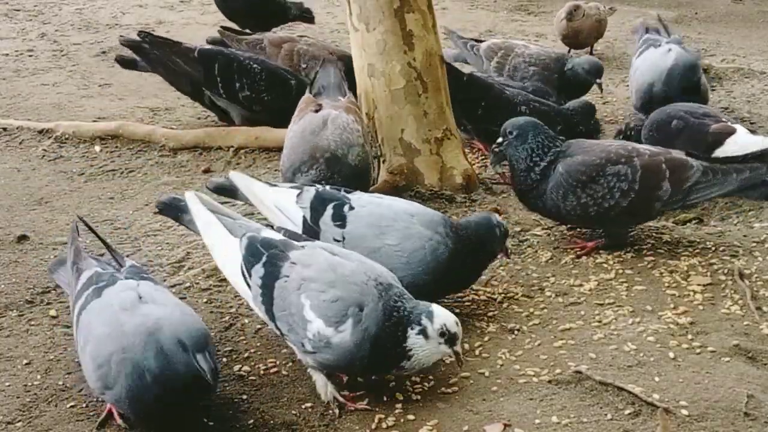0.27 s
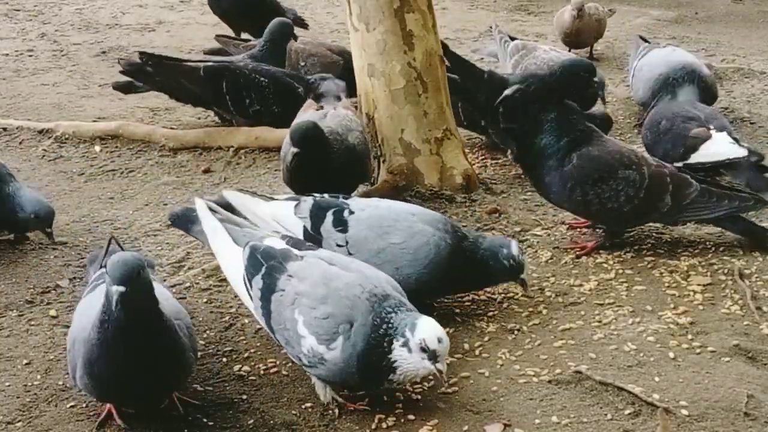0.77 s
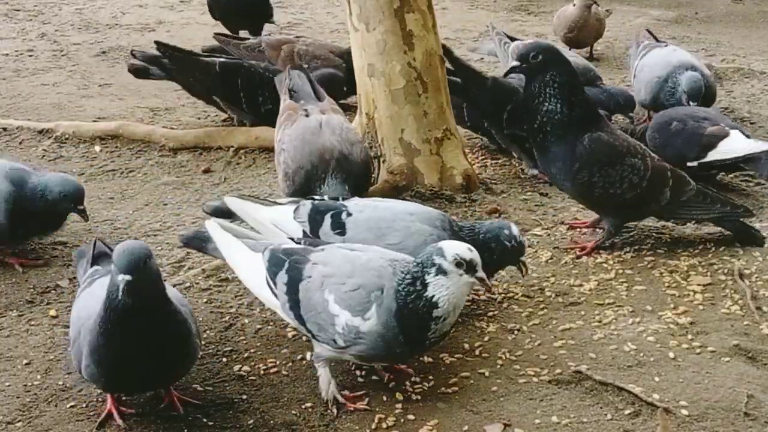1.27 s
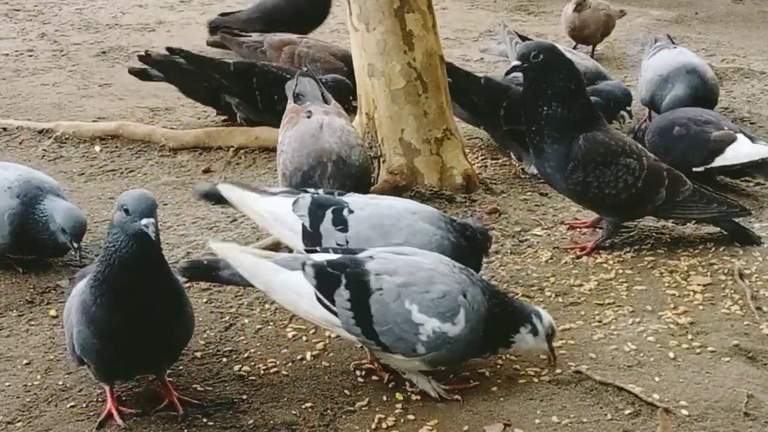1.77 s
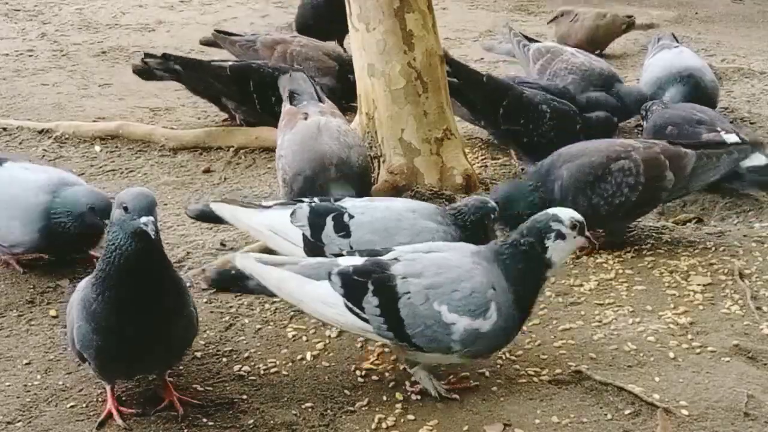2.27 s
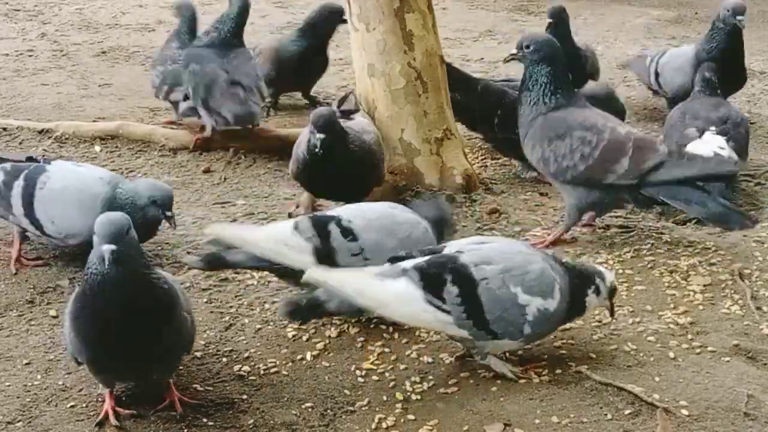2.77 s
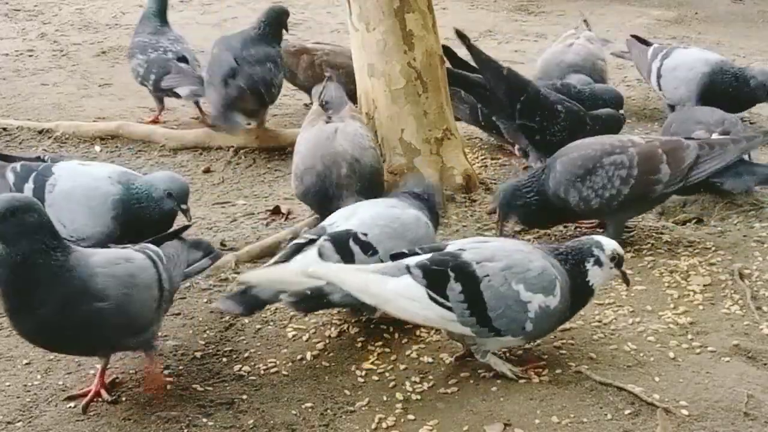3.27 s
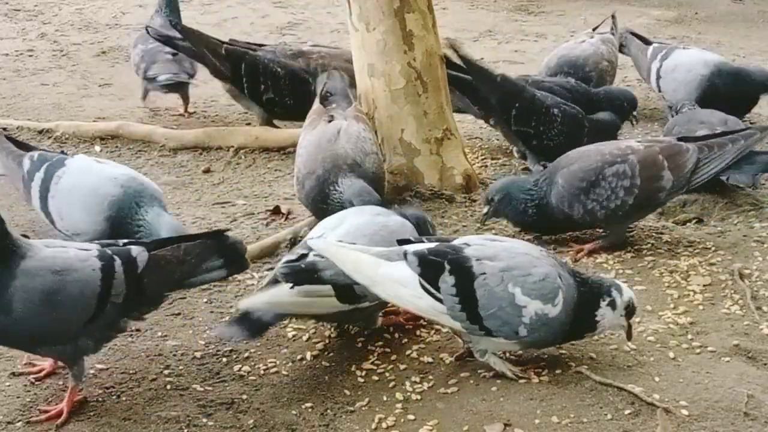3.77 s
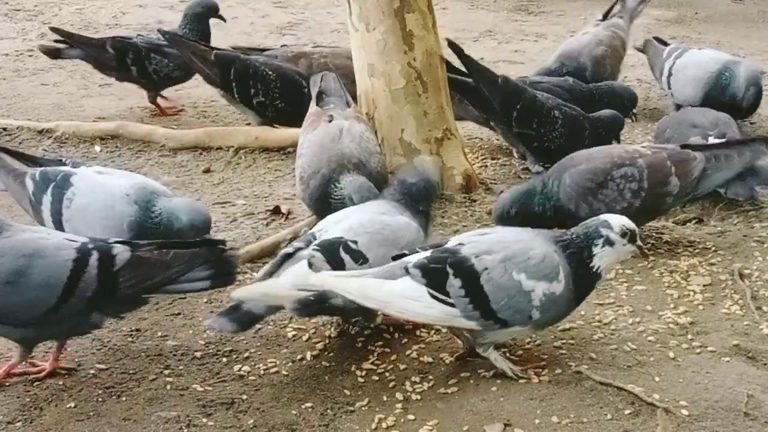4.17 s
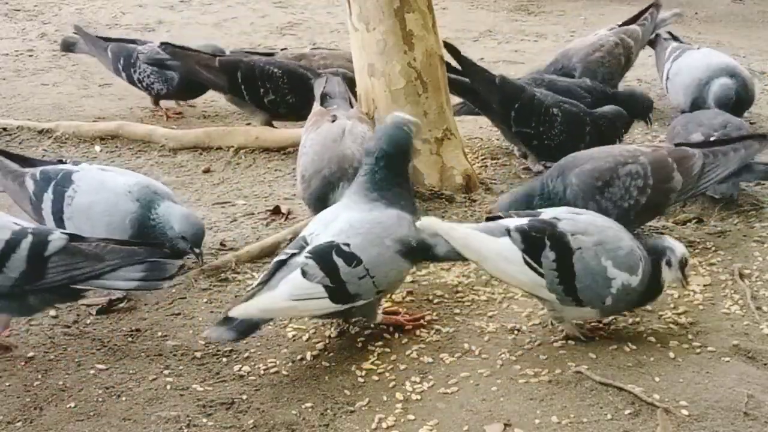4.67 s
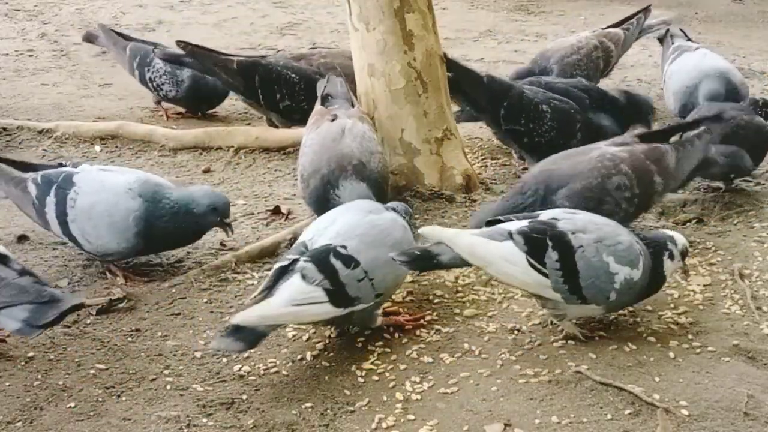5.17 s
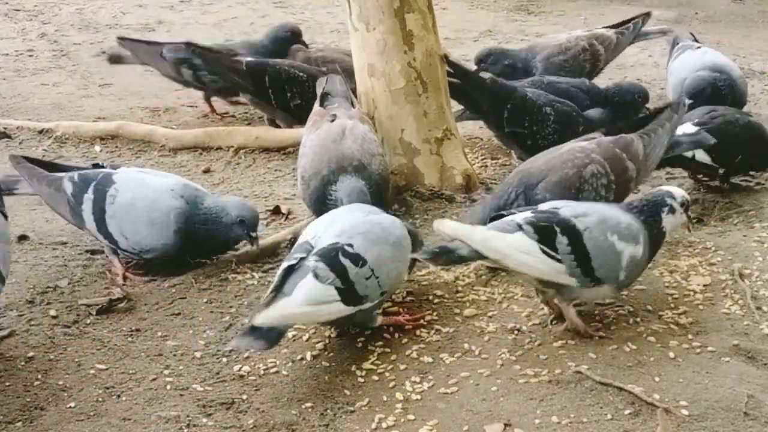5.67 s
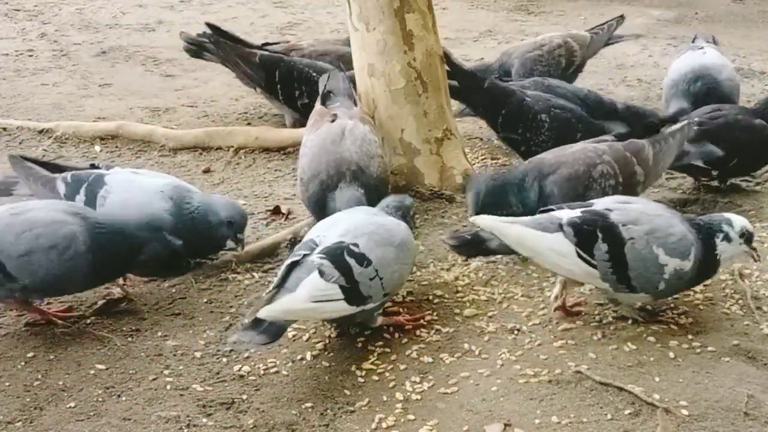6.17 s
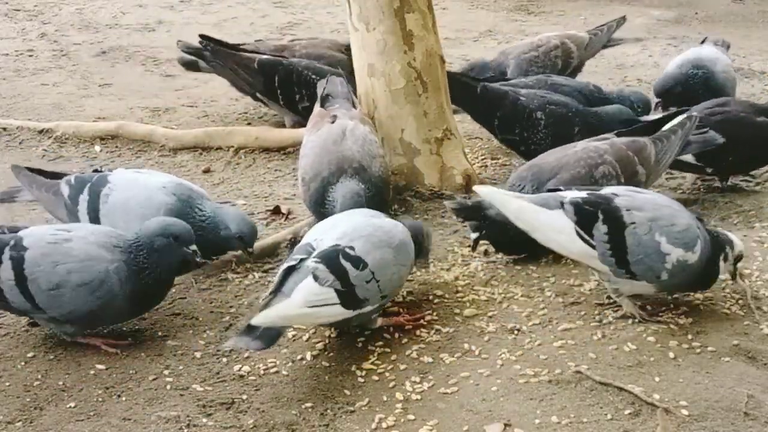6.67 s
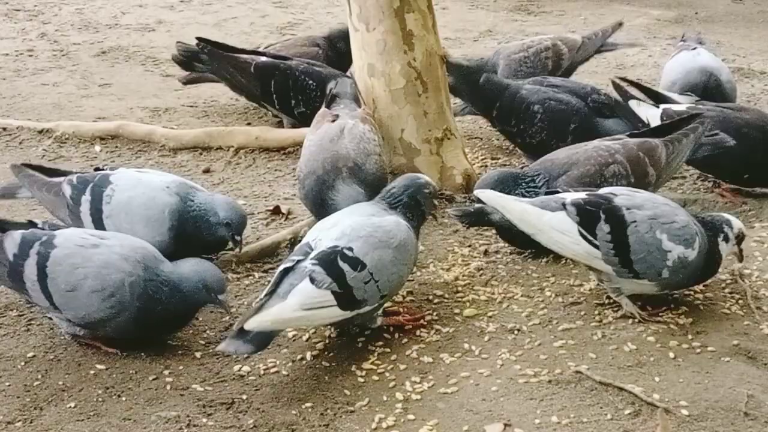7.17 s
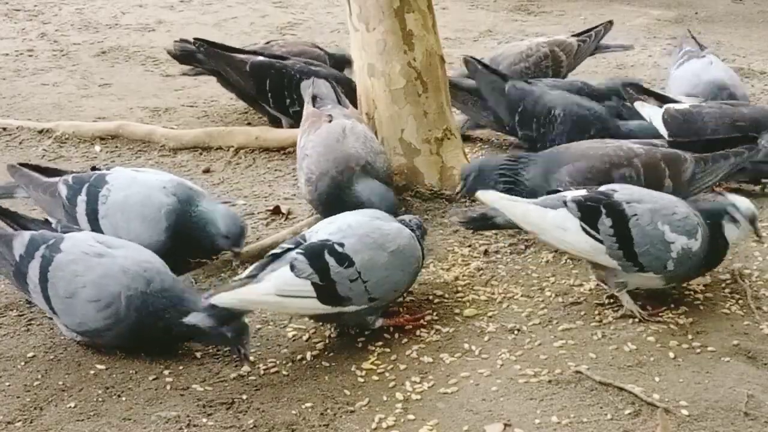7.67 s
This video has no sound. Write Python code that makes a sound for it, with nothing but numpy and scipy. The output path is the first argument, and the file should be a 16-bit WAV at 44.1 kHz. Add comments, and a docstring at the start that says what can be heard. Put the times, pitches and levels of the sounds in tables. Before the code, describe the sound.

Bursts of pigeon wing flaps, claps and feather rustle in a park, with sparrow chirps, faint town hum and one low coo.

```python
"""A city park, where pigeons feed on scattered grain close to the microphone.
They jostle and flutter up: wings push puffs of air, wing tips clap and feathers whistle.
At the end one coos through its swollen crop, the pouch in its throat.
Sparrows chirp in the trees around; far off are two hoarse caws, thin whines and the hum of the town."""
import sys
import numpy as np
from scipy import signal
from scipy.fft import rfft, irfft, next_fast_len
from scipy.io import wavfile
from scipy.ndimage import uniform_filter1d, map_coordinates

SR = 44100
rng = np.random.default_rng(int(sys.argv[2]) if len(sys.argv) > 2 else 0)


def file_out(sig):
    """Save sig as 16-bit WAV at sys.argv[1]."""
    # one column per channel
    cols = np.atleast_2d(sig).T
    # limit, then scale
    lim = np.clip(cols, -1, 1)
    pcm = np.round(lim * 32767).astype(np.int16)
    wavfile.write(sys.argv[1], SR, pcm)


N = 349713
TIME = np.arange(N) / SR


def amp(db):
    """Turns decibels into a volume factor."""
    return 10 ** (np.asarray(db) / 20)


def unit(x):
    """Scales a sound to an average (rms) level of one."""
    return x / np.sqrt(np.mean(x ** 2) + 1e-20)


def look_up(table, hz):
    """Reads between a table's rows, with every octave equally wide."""
    row_hz, value = np.transpose(table)
    return np.interp(np.log(hz + 1), np.log(row_hz + 1), value)


def add(mix, start, sound):
    """Mixes a sound in, starting at a time in seconds."""
    part = mix[max(round(start * SR), 0):][:len(sound)]
    part += sound[:len(part)]


def colour(x, spectrum):
    """Turns each frequency up or down as a table says, then sets the level to one."""
    size = next_fast_len(len(x))
    gains = amp(look_up(spectrum, np.fft.rfftfreq(size, 1 / SR)))
    return unit(irfft(rfft(x, size) * gains, size)[:len(x)])


def noise(spectrum, size):
    """Noise with a chosen tone colour."""
    return colour(rng.standard_normal(size), spectrum)


def wander(t, rate):
    """Drifts to a new random value `rate` times a second."""
    targets = rng.standard_normal(4096)
    return map_coordinates(targets, [(t - t[0]) * rate], order=1, mode="wrap")


def swell(t, rise_s, decay_s):
    """Rises softly to one, then dies away."""
    shape = (1 - np.exp(-(t / rise_s) ** 2)) * np.exp(-t / decay_s)
    return shape / shape.max()


def bump(t, centre, length):
    """A bell-shaped rise to one and back."""
    return np.exp(-(2 * (t - centre) / length) ** 2)


def rasp(t, depth, rate):
    """A fast random flutter of level that makes a pure tone harsh."""
    flutter = unit(uniform_filter1d(wander(t, rate), round(SR / rate)))
    return (1 + depth * flutter) / np.sqrt(1 + depth ** 2)


# How long the park echoes: (frequency [Hz], time to fade by 60 dB [s])
ECHO_TIMES = [(200, 0.53), (1000, 1), (4000, 0.7), (7000, 0.7), (14000, 0.17)]


def outdoors(x, echo_db, early_db=1., early_s=.028):
    """Adds echoes from ground, trunks and walls: a strong early cluster and a long thin tail."""
    t = np.arange(SR) / SR
    bounces = rng.standard_normal(SR) * (rng.random(SR) < 1 / 20) * (t > .003)
    bounces *= 1 + amp(early_db) * np.exp(-t / early_s)
    hz, age, bands = signal.stft(bounces, SR, nperseg=256)
    fade = amp(-60 * age / look_up(ECHO_TIMES, hz)[:, None])
    tail = signal.istft(bands * fade, SR, nperseg=256)[1]
    heard = amp(echo_db) * signal.fftconvolve(x, tail / np.linalg.norm(tail))
    heard[:len(x)] += x
    return heard


# Tone colour of the town's hum: (frequency [Hz], gain [dB])
TOWN_COLOUR = [(20, -42), (35, -23), (55, -4), (90, 3.5), (130, 3), (220, -2), (400, -10), (800, -19.5),
               (1500, -31.5), (2600, -21), (4400, -13), (5400, -19), (6800, -12), (8600, -31), (11500, -37),
               (15000, -29)]
# How the hum rises and falls: (time [s], gain [dB])
TOWN_SWELL = [(0, -3.5), (.8, 3), (1.45, -3.5), (2.1, 0), (3.5, 1), (4.8, 0), (5.6, -1.5), (6.2, -1),
              (7, 1.5), (7.93, 2)]


def town(level_db=-59.5):
    """Distant traffic and air, slowly swelling and fading."""
    swell_db = np.interp(TIME, *np.transpose(TOWN_SWELL)) - .03 * wander(TIME, 4)
    return amp(level_db + swell_db) * noise(TOWN_COLOUR, N)


# Far-off tones: (time [s], length [s], first pitch [Hz], last pitch [Hz], relative level [dB])
WHINES = [(1.999, 0.25, 4440, 4630, -63), (4.169, 0.096, 697, 693, -66.5), (5.044, 0.84, 1055, 980, -69.5),
          (5.849, 0.58, 3360, 3130, -65.5), (5.85, 0.52, 6620, 6400, -71), (6.4, .9, 3130, 2870, -68),
          (6.649, 1.25, 2376, 2130, -71), (6.76, .6, 4750, 4400, -72)]


def whines(gain_db=-4.):
    """Thin, slowly gliding tones from far away, smeared by echoes."""
    out = np.zeros(N)
    for start, length, from_hz, to_hz, db in WHINES:
        t = np.arange(0, length, 1 / SR)
        hz = np.linspace(from_hz, to_hz, len(t)) * (1 + .018 * wander(t, 200))
        tone = np.sin(2 * np.pi * np.cumsum(hz) / SR) * rasp(t, depth=1., rate=60.1)
        tone *= signal.windows.tukey(len(t), .15)
        add(out, start, amp(db + gain_db + 2.2 * wander(t, 8.1)) * tone)
    return outdoors(out, echo_db=4.5)[:N]


# What a crow's throat lets through: (frequency [Hz], gain [dB])
CROW_THROAT = [(900, -43), (1450, -11.5), (1650, 0.5), (1800, 1.5), (1950, -5), (2300, -23), (4000, -40)]
# The two caws: (time [s], relative level [dB], length [s])
CAWS = [(5.168, -62, 0.31), (6.239, -64, 0.51)]


def crow(pulse_hz=290.5, gain_db=-3.):
    """Pulses of breath ring in a crow's throat; from so far away the caws are mostly echo."""
    out = np.zeros(N)
    for start, db, length in CAWS:
        t = np.arange(0, length, 1 / SR)
        breath = rng.standard_normal(len(t)) * (1 + np.cos(2 * np.pi * pulse_hz * t))
        caw = colour(breath, CROW_THROAT) * signal.windows.tukey(len(t), .7)
        add(out, start, amp(db + gain_db) * caw)
    return outdoors(out, echo_db=2.5)[:N]


def ground_bounce(x, share=.31):
    """A bird in a tree is heard twice: directly, and off the ground a moment later."""
    lag = round(rng.uniform(.0013, .0026) * SR)
    return (np.pad(x, (0, lag)) + share * np.pad(x, (lag, 0))) / np.sqrt(1 + share ** 2)


# What a sparrow's throat and beak let through: (frequency [Hz], gain [dB])
SPARROW_BEAK = [(2300, -23), (2800, -14), (3200, -4.5), (3700, -0.5), (4500, 0), (6200, 0), (7000, -5.5),
                (7800, -23.5), (9000, -25), (12000, -16.5)]


def sparrow(t, hz, db, rough, echo_db, octave_db, trill_hz=170.8, gain_db=-2.):
    """A buzzy whistle; on low notes the throat favours the octave, at twice the pitch."""
    trill = .035 * np.sin(2 * np.pi * trill_hz * t + wander(t, 100))
    hz = hz * (1 + trill + .022 * wander(t, 160))
    hz *= 1 + .035 * wander(t, 900)
    phase = 2 * np.pi * np.cumsum(hz) / SR
    voice = np.zeros(len(t))
    for k, harmonic_db in enumerate([0, octave_db, octave_db - 10, octave_db - 13], 1):
        voice += amp(harmonic_db + look_up(SPARROW_BEAK, k * hz)) * np.sin(k * phase)
    voice *= amp(db + gain_db + 3 * wander(t, 196.6)) * rasp(t, rough, rate=2615)
    voice *= signal.windows.tukey(len(t), .28)
    return outdoors(ground_bounce(np.sqrt(2) * voice), echo_db)


# Sliding sparrow notes: (time [s], length [s], first pitch [Hz], last pitch [Hz],
# relative level [dB], roughness [0 = none], echo [dB])
SLIDES = [(0.121, 0.14, 3950, 4880, -64.5, .1, -5), (0.838, .02, 6600, 4250, -50.5, .4, -3.5),
          (0.859, 0.019, 4400, 5700, -52.5, .4, -2), (0.952, 0.025, 6970, 6800, -44, 0.4, 3.5),
          (.958, 0.017, 6000, 3440, -47.5, 0.8, 7), (.972, .075, 4490, 3693, -49.5, 0.9, 6.5),
          (1.5, .08, 6120, 5500, -62.5, 0, -5), (2.191, 0.029, 6960, 4510, -52, 1., 6),
          (2.212, 0.054, 4175, 3190, -54.5, 1.2, 5), (5.288, 0.082, 4600, 3900, -46, 1, 0),
          (5.322, 0.073, 6430, 6900, -53.5, 0.8, 1)]


def sparrow_slides():
    """Sparrows deeper in the trees slide straight from one pitch to another."""
    out = np.zeros(N)
    for start, length, from_hz, to_hz, db, rough, echo_db in SLIDES:
        t = np.arange(0, length, 1 / SR)
        hz = np.linspace(from_hz, to_hz, len(t))
        add(out, start, sparrow(t, hz, db, rough, echo_db, octave_db=-4))
    return out


# Two-part sparrow calls: (time [s], arch length [s], share of the arch sung [0-1], arch top [Hz],
# relative arch level [dB], note top [Hz], relative note level [dB])
CHIRRUPS = [(3.308, .097, 1., 2943, -54.5, 3850, -49), (3.858, 0.058, 0.66, 3086, -44.5, 4010, -39),
            (4.417, 0.089, 1., 3044, -48.5, 3764, -41), (6.41, .1, 1., 3040, -46.5, 3750, -42.5),
            (7.685, .098, 1., 3060, -44, 3787, -39.5)]


def sparrow_chirrups(foot_hz=2390, note_s=.056, rough=.42, echo_db=-2.):
    """A low arch of pitch, heard mostly as its octave, then a short, bent, higher note."""
    out = np.zeros(N)
    for start, length, share, top_hz, arch_db, note_hz, note_db in CHIRRUPS:
        t = np.arange(0, length, 1 / SR)
        arch = np.sin(np.pi * (share * t / length) ** .8)
        hz = foot_hz + (top_hz - foot_hz) * arch
        add(out, start, sparrow(t, hz, arch_db, rough, echo_db, octave_db=4))
        t = np.arange(0, note_s, 1 / SR)
        bend = (2 * (t / note_s) ** .798 - 1) ** 2  # both ends are lower and softer
        hz = note_hz * (1 - .1506 * bend)
        add(out, start + length, sparrow(t, hz, note_db - 4 * bend, rough, echo_db, octave_db=-4))
    return out


# Leaping sparrow calls: (time [s], length [s], held pitch [Hz], relative lead-in level [dB],
# gain of the lead-in's octave [dB], relative held level [dB], echo [dB])
CHEEPS = [(1.708, .124, 4300, -43, -8, -46, 5), (4.167, .12, 4500, -38.5, -4, -41, 2.5),
          (5.135, 0.1, 4480, -48, 7, -33, -4), (5.67, .112, 3840, -47, -1.5, -45, 2.5),
          (7.362, .129, 4534, -42.5, 1, -32.5, 1.5)]


def sparrow_cheeps(leap_at_s=.039, leap_s=.00412, rough=.36, held_octave_db=-10.5):
    """A low lead-in climbs, leaps to a held note and droops at the end."""
    out = np.zeros(N)
    for start, length, held_hz, lead_db, lead_octave_db, held_db, echo_db in CHEEPS:
        t = np.arange(0, length, 1 / SR)
        leap = .5 + .5 * np.tanh((t - leap_at_s) / (2 * leap_s))  # goes from 0 to 1
        lead_hz = 2493 + 18000 * t
        droop = 1 - .1194 * (t / length) ** 6
        hz = (lead_hz * (1 - leap) + held_hz * leap) * droop
        db = lead_db + (held_db - lead_db) * leap
        octave_db = lead_octave_db + (held_octave_db - lead_octave_db) * leap
        add(out, start, sparrow(t, hz, db, rough, echo_db, octave_db))
    return out


# Tone colours of the moving flock: (frequency [Hz], gain [dB])
FEATHER_HISS = [(600, -8), (1500, -2), (3000, 0), (5000, 1.5), (7000, 9), (8300, -6), (11000, -13.5),
                (15000, -8)]  # feathers brushing together
CRISP_EDGE = [(4000, -40), (7000, -8), (9000, 0.5), (15000, 11)]  # the highest part of a tick or clap
AIR_WHOOSH = [(60, -41), (200, -13), (330, 8), (500, -0.5), (680, 0.5), (900, -16), (1500, -40.5),
              (4000, -59)]  # moving air
FEATHER_HUSH = [(300, -13.5), (650, -2), (950, -3), (1400, -7.5), (2000, -11.5), (3500, -11.5),
                (8000, -29.5)]  # air passing through feathers
# Quiet feeding, in relative levels: (feathers [dB], whoosh [dB], hush [dB])
FEEDING = (-81, -75.5, -66)
# Scuffles, in relative levels: (middle time [s], length [s], feathers [dB], whoosh [dB], hush [dB])
SCUFFLES = [(.5, 0.39, -64, -59, -51.5), (0.794, 0.53, -74.5, -79, -62.5), (1.193, 0.22, -76, -79, -69),
            (2.032, 0.7, -76, -76, -88), (2.569, 0.25, -62, -51, -62), (2.906, 0.38, -62, -62, -62),
            (3.149, .12, -69.5, -51.5, -73), (3.362, 0.43, -71, -70.5, -65.5),
            (3.706, 0.31, -77.5, -76, -70), (4.054, 0.22, -66, -69.5, -67), (4.42, 0.27, -65, -65, -62.5),
            (4.834, 0.39, -67.5, -75, -76), (5.462, 0.12, -68, -79, -73), (6.93, 0.19, -100, -58, -54),
            (7.147, 0.29, -90, -55.5, -65), (7.78, 0.5, -74.5, -62.5, -69)]


def rustle(ticks_per_s=200., tick_decay_s=.0013):
    """Feathers brush, beaks and claws tick on grain and grit, and stirred air hushes through wings."""
    power = amp(FEEDING)[:, None] ** 2 * np.ones(N)
    for middle, length, *levels_db in SCUFFLES:
        power += np.outer(amp(levels_db), bump(TIME, middle, length)) ** 2
    feather_level, whoosh_level, hush_level = np.sqrt(power)
    sizes = amp(3.5 * np.minimum(rng.exponential(1, N), 4))
    ticks = (rng.random(N) < ticks_per_s / SR) * sizes
    tick_fade = np.exp(-np.arange(256) / SR / tick_decay_s)
    scratches = signal.oaconvolve(ticks, tick_fade)[:N] * rng.standard_normal(N)
    grit = amp(4) * colour(scratches, FEATHER_HISS)
    grit += amp(-6.5) * colour(unit(scratches) + rng.standard_normal(N), CRISP_EDGE)
    hiss = noise(FEATHER_HISS, N) * amp(11 + 1.9 * wander(TIME, 70))
    air = whoosh_level * noise(AIR_WHOOSH, N) + amp(-2) * hush_level * noise(FEATHER_HUSH, N)
    fidget = amp(2 * wander(TIME, 18))
    stir = amp(3 * wander(TIME, 45))
    return feather_level * fidget * (hiss + grit) + stir * air


# Tone colours of a clap: (frequency [Hz], gain [dB])
SHARP_CRACK = [(800, -40), (2500, -0.5), (4500, -2.5), (7000, 10), (8500, -15), (15000, -30)]  # the hit itself
FEATHER_SLAP = [(300, -5), (800, 6), (1300, -0.5), (1900, 7), (2600, -14), (5000, 3.5), (9000, -49)]  # its lower body, also the sound of flat feathers fluttering


def clap(crack_db, body_db, top_db, decay_s):
    """Two stiff surfaces meet in a crack a few milliseconds long."""
    t = np.arange(2048) / SR
    layers = (crack_db, SHARP_CRACK), (body_db, FEATHER_SLAP), (top_db, CRISP_EDGE)
    crack = sum(amp(db) * noise(spectrum, len(t)) for db, spectrum in layers)
    return crack * swell(t, .00094, decay_s)


# Pecks at the grain: (time [s], relative level [dB])
PECKS = [(.4598, -35), (2.9262, -27.5), (3.1245, -28.5), (3.133, -26.5), (5.462, -45)]


def pecks():
    """A beak snaps shut close by."""
    out = np.zeros(N)
    for start, db in PECKS:
        add(out, start, clap(crack_db=db - 12.5, body_db=db - 24, top_db=db - 19, decay_s=.0019))
    return outdoors(out, echo_db=-12)[:N]


# What a pigeon's swollen crop lets through: (frequency [Hz], gain [dB])
PIGEON_CROP = [(180, 0), (300, -1), (400, -2.5), (480, -3), (600, 3), (690, 3), (770, -15), (1000, -22)]


def pigeon_voice(t, hz, base_level, overtone_level, third_db, rough, jitter):
    """Three soft tones, at one, two and three times the pitch, sound through the crop."""
    phase = 2 * np.pi * np.cumsum(hz * (1 + jitter * wander(t, 149.3))) / SR
    base, octave, third = (amp(look_up(PIGEON_CROP, k * hz)) * np.sin(k * phase) for k in (1, 2, 3))
    overtones = rasp(t, rough, rate=160.5) * (octave + amp(third_db) * third)
    voice = base_level * base + overtone_level * overtones
    return voice * amp(2.5 * wander(t, 90)) * signal.windows.tukey(len(t), .15)


# The coo's rolled note: (time [s], length [s], pitch at both ends [Hz], arch top [Hz], level [dB])
COO_ROLL = (7.295, .335, 225, 333, -42)
# Throbs of the throat in that note: (middle time [s], pitch [Hz], level [dB], length [s])
COO_THROBS = [(7.36, 300.2, -33.5, 0.024), (7.412, 349.6, -25.5, 0.015), (7.464, 396.6, -26.5, .014),
              (7.523, 304, -32.5, 0.016), (7.6, 236, -44, 0.014)]
# The low drone after it: (time [s], length [s], pitch [Hz], level [dB])
COO_DRONE = (7.63, .3, 196, -50)


def coo(lift_at_s=7.89, lift_s=.0406, lift_hz=45.3):
    """A husky rolled note, where deep throbs take turns with the octave, then a cleaner low drone."""
    out = np.zeros(N)
    start, length, end_hz, top_hz, db = COO_ROLL
    t = np.arange(0, length, 1 / SR)
    arch = np.sin(np.pi * (t / length) ** .85)
    hz = end_hz + (top_hz - end_hz) * arch
    level = amp(db - 13.5 * (1 - arch))
    base, overtones = amp(-6) * level, level
    for middle, throb_hz, throb_db, throb_s in COO_THROBS:
        throb = bump(start + t, middle, throb_s)
        hz = hz + (throb_hz - hz) * np.sqrt(throb)
        base = base + amp(throb_db) * throb
        overtones = overtones * (1 - .37 * throb)
    husk = amp(-5) * level * noise(AIR_WHOOSH, len(t))
    add(out, start, pigeon_voice(t, hz, base, overtones, third_db=-3, rough=.46, jitter=.051) + husk)
    start, length, hz, db = COO_DRONE
    t = np.arange(0, length, 1 / SR)
    hz = hz + lift_hz * bump(start + t, lift_at_s, lift_s)
    add(out, start, pigeon_voice(t, hz, amp(db), amp(db - 1.5), third_db=-5.5, rough=.2, jitter=.015))
    return outdoors(out, echo_db=-11.5)[:N]


# A wing's whoosh around its own pitch: (frequency [times the pitch], gain [dB])
WING_SWISH = [(.15, -24), (.5, -5), (.85, 4), (1.1, 5), (1.5, -11), (2.1, -8), (3.2, -19), (9, -34)]
# The deep puff of air under a wing: (frequency [Hz], gain [dB])
AIR_PUFF = [(20, -42), (35, -31), (55, 0.5), (80, 5), (140, 4), (220, -10), (500, -38), (1500, -63)]


def wing_stroke(whoosh_db, hz, puff_db, flutter_db, hiss_db, decay_s):
    """A wing pushes a puff of air and a whoosh, while its feathers flutter and slide together."""
    t = np.arange(8192) / SR
    whoosh = amp(whoosh_db) * noise(np.array(WING_SWISH) * [hz, 1], len(t))
    flutter = amp(flutter_db) * noise(FEATHER_SLAP, len(t))
    hiss = amp(hiss_db) * noise(FEATHER_HISS, len(t)) * amp(2 * wander(t, 340))
    puff = amp(puff_db) * noise(AIR_PUFF, len(t)) * swell(t, .0041, .023)
    return (whoosh + flutter + hiss) * swell(t, .0029, decay_s) + puff


# Single flaps, in relative levels: (time [s], whoosh [dB], whoosh pitch [Hz], puff [dB], feathers [dB])
GROUND_FLAPS = [(.177, -54, 840, -71, -72), (.273, -39, 258, -48, -53.5), (.364, -40, 317, -41.5, -50.5),
                (.444, -39.5, 740, -41.5, -56), (.514, -45.5, 280, -46, -57), (.612, -47, 850, -47, -57),
                (.713, -47, 254, -53, -60), (.914, -53, 680, -58, -74), (1.195, -60, 328, -49.5, -59),
                (1.587, -46, 686, -65, -69), (1.619, -43, 403, -73, -55.5), (1.737, -45.5, 479, -64, -63),
                (1.79, -49, 480, -52, -65), (1.895, -66, 314, -46, -72), (2.472, -35.5, 346, -52, -54),
                (2.573, -43, 355, -55, -56), (3.123, -30, 547, -70, -49), (4.386, -36, 350, -80, -46.5),
                (4.506, -45.5, 500, -72, -63), (5.239, -45, 266, -56, -50), (5.945, -48, 270, -71, -67),
                (6.001, -47, 593, -74, -78), (6.08, -45.5, 538, -68, -62), (6.17, -43.5, 644, -78, -59.5)]


def ground_flaps():
    """Pigeons on the ground beat a wing to keep their place at the grain."""
    out = np.zeros(N)
    for start, whoosh_db, hz, puff_db, feather_db in GROUND_FLAPS:
        flap = wing_stroke(whoosh_db - 10, hz, puff_db + 2, feather_db, feather_db - 4.5, decay_s=.021)
        add(out, start, flap)
    return outdoors(out, echo_db=-11.5)[:N]


def feather_whistle(hz, db, upstroke_s=.0577, gain_db=-.5):
    """The outer feather flutters in the airflow, rising in pitch as the wing speeds up."""
    t = np.arange(0, 2 * upstroke_s, 1 / SR)
    glide = .051 * (np.minimum(t / upstroke_s, 1) - .5)
    pitch = hz * (1 + glide + .021 * wander(t, 633))
    tone = np.sin(2 * np.pi * np.cumsum(pitch) / SR) * rasp(t, depth=.5, rate=500)
    return amp(db + gain_db) * tone * swell(t, upstroke_s * .19, upstroke_s * .36)


# Wingbeats in flight, in relative levels:
# (time [s], crack [dB], feather slap [dB], downstroke [dB], whistle pitch [Hz], whistle [dB])
WINGBEATS = [(2.444, -17.5, -47, -48, 2665, -47.5), (2.53, -50, -52, -29, 2400, -62),
             (2.645, -25, -46, -34, 2350, -52), (2.7528, -29, -41, -44, 2344, -54),
             (2.8638, -37, -42.5, -42, 2340, -47.5), (2.9788, -29.5, -41.5, -47, 2327, -46),
             (3.096, -34, -48, -60, 2320, -50), (3.2256, -29, -46, -42.5, 2310, -60),
             (3.3598, -40, -48, -57, 2330, -56), (3.4895, -35, -51, -54, 2320, -52),
             (3.622, -48, -53, -56, 2363, -52), (3.729, -51, -52.5, -55, 2325, -46.5),
             (3.845, -36, -50, -49.5, 2426, -54), (3.946, -52, -52, -56, 2334, -50),
             (4.056, -42, -54, -54, 2337, -48), (4.315, -56, -69, -65, 2250, -54),
             (4.77, -54, -67, -66, 2360, -59), (4.888, -42, -59, -69, 2280, -56.5),
             (5.003, -55, -63, -68, 2310, -55), (5.1168, -34.5, -54, -58, 2340, -54)]


def flight(downstroke_hz=340, upstroke_after_s=.016):
    """Wing tips clap over the back, sweep down, and whistle on the way up."""
    wings, whistles = np.zeros(N), np.zeros(N)
    for start, crack_db, slap_db, down_db, whistle_hz, whistle_db in WINGBEATS:
        add(wings, start, clap(crack_db - 13, slap_db, top_db=crack_db - 21, decay_s=.0031))
        downstroke = wing_stroke(down_db - 10, downstroke_hz, puff_db=down_db - 13.5,
                                 flutter_db=slap_db - 11, hiss_db=down_db - 19, decay_s=.03)
        add(wings, start, downstroke)
        add(whistles, start + upstroke_after_s, feather_whistle(whistle_hz, whistle_db))
    return outdoors(wings, echo_db=-9)[:N] + outdoors(whistles, echo_db=-3.5)[:N]


def scene():
    """The pigeons in front, the other birds and the town behind."""
    pigeons = ground_flaps() + flight() + pecks() + rustle() + coo()
    sparrows = sparrow_cheeps() + sparrow_chirrups() + sparrow_slides()
    return (pigeons + sparrows + crow() + whines() + town())[None]


def record(dry, bass_hz=45., treble_hz=15650):
    """The microphone loses the deepest bass and the recorder cuts off the highest treble."""
    bass_cut = signal.butter(4, bass_hz, "high", fs=SR, output="sos")
    treble_cut = signal.firwin(511, treble_hz, window=("kaiser", 9), fs=SR)
    return signal.oaconvolve(signal.sosfilt(bass_cut, dry), treble_cut[None], "same")


dry = scene()
out = record(dry)
file_out(out)
```